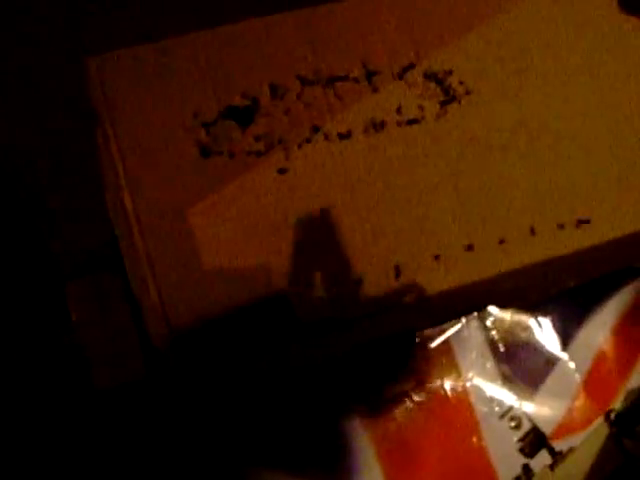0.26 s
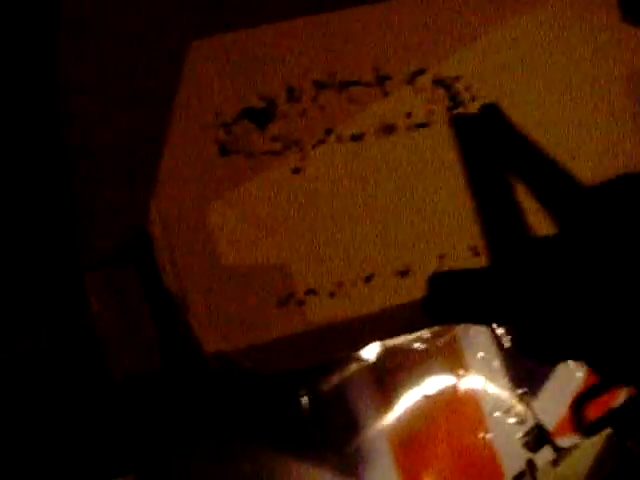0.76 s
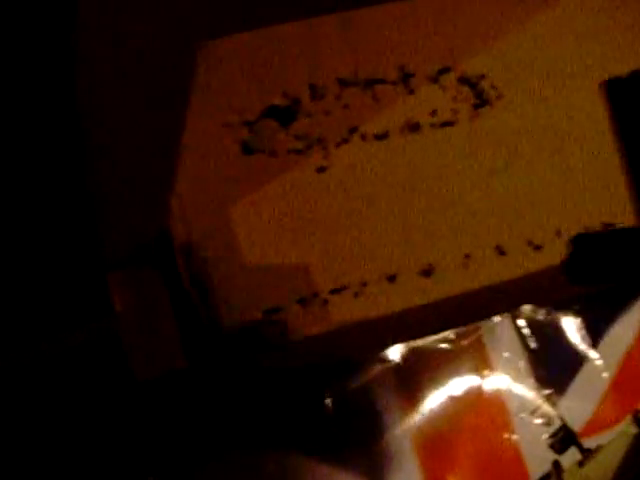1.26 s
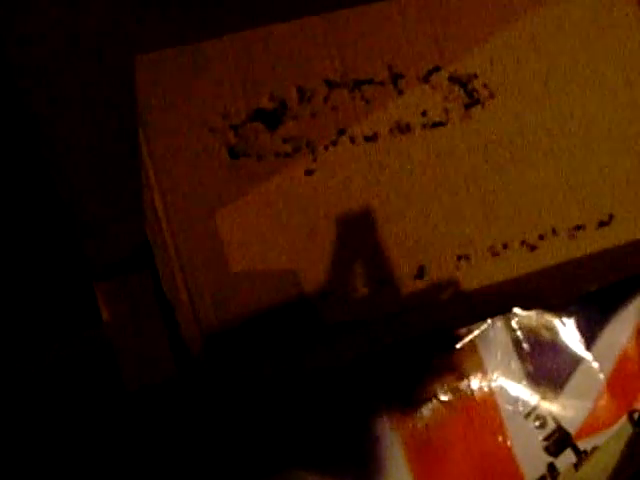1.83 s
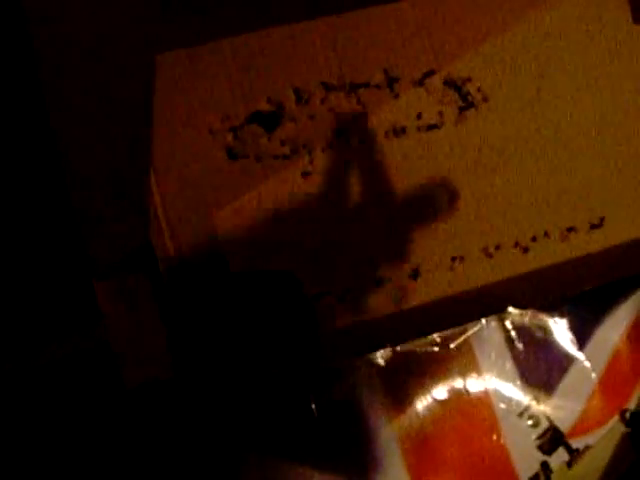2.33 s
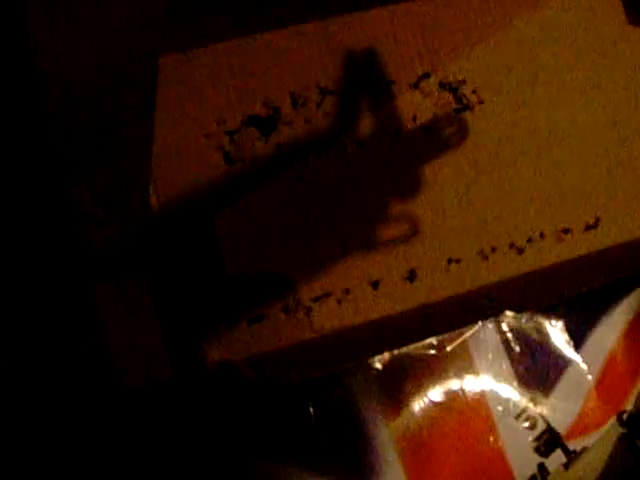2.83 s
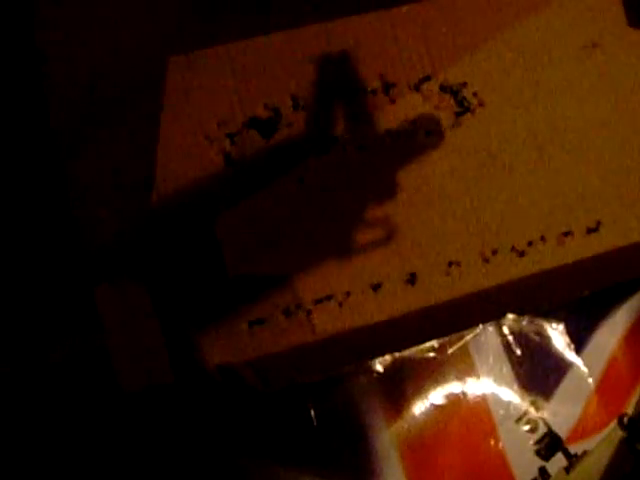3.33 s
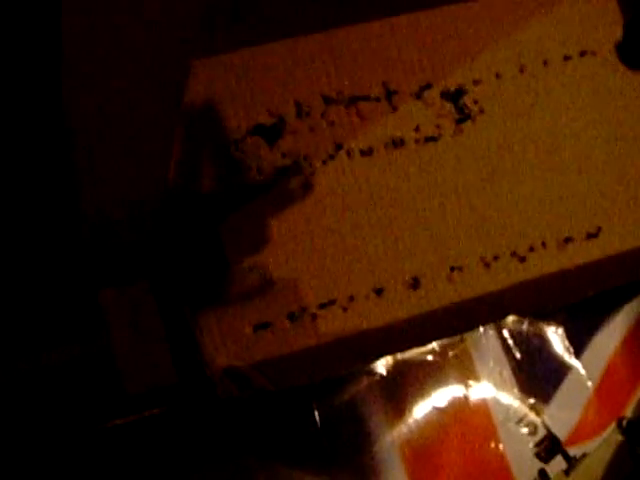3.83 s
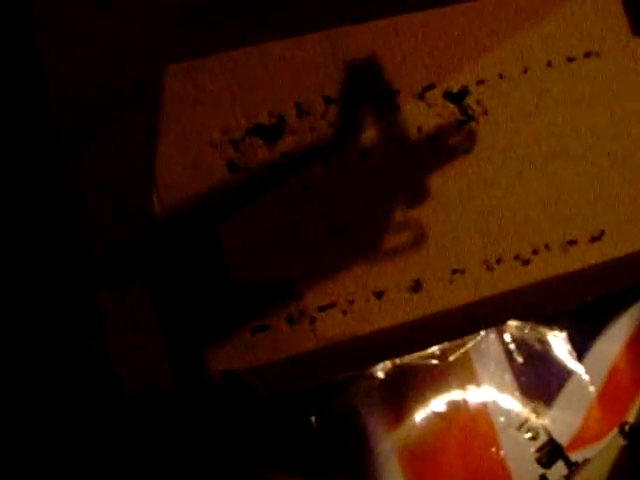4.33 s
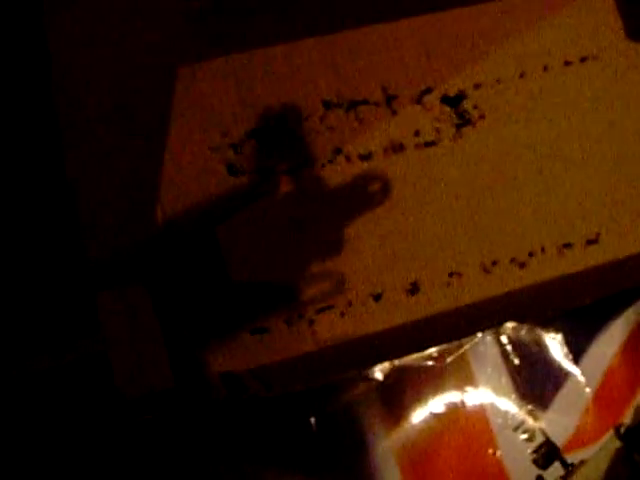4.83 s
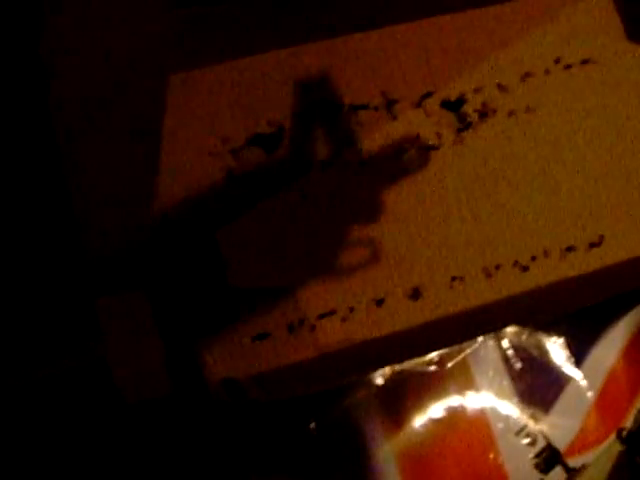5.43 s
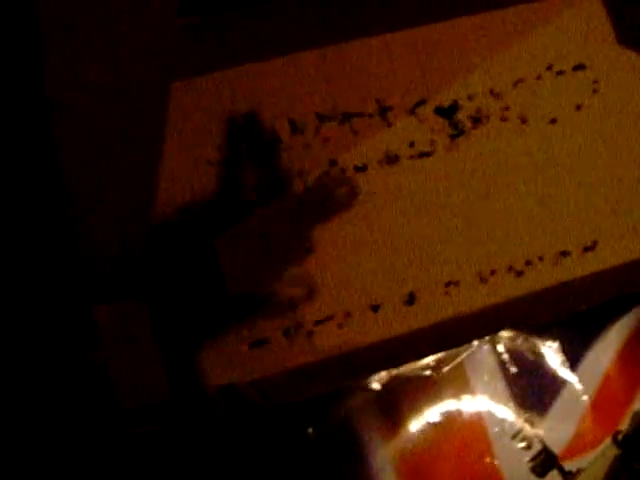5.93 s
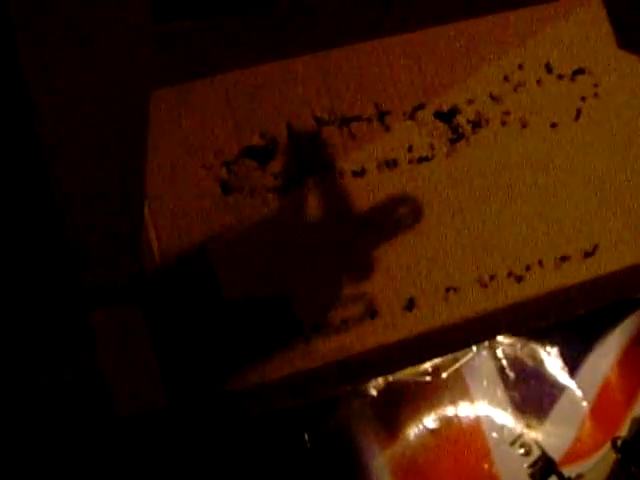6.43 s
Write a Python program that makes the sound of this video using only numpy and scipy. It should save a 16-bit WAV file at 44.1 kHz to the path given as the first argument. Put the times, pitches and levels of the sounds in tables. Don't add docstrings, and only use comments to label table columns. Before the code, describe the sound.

A toy electric pellet rifle is already firing full-auto: grinding motor, rattling gears, fast piston slaps and dull thuds into a hollow cardboard box. It stops, a spring rings briefly, the grip creaks. A short second burst ends in a loud click, pellets bounce and tick, then a third burst starts with a brief gear whine and runs to the end. Small room, close, cheap, overloaded microphone.

```python
import sys
import numpy as np
from scipy import signal
from scipy.fft import rfft, irfft
from scipy.io import wavfile
from scipy.ndimage import uniform_filter1d

SR = 44100
rng = np.random.default_rng(int(sys.argv[2]) if len(sys.argv) > 2 else 0)


def gain_from_db(level_db):
    decades = np.asarray(level_db, float) / 20
    return 10 ** decades


def materialize(psi):
    bounded = np.clip(np.atleast_2d(psi).T, -1, 1)
    quanta = np.round(bounded * 32767).astype(np.int16)
    wavfile.write(sys.argv[1], SR, quanta)


N = 294147

# pulled t/s, released t/s, run-down time/s
BURSTS = [
    (-1.0, 2.08, 0.11),
    (3.380, 4.19, 0.044),
    (5.012, 7.0, 0.1),
]


def rms_one(x):
    return x / np.sqrt(np.mean(x ** 2) + 1e-20)


def in_time(rows, silent_db=-120):
    s, *columns = np.transpose(rows)
    return [np.interp(np.arange(N) / SR, s, c, silent_db, silent_db) for c in columns]


def colour(x, points):
    size = 4096
    hz, db = np.transpose(points)
    bins_hz = np.arange(size // 2 + 1) * SR / size
    log_gain = np.log(gain_from_db(np.interp(np.log(bins_hz + 1), np.log(hz), db)))
    fold = irfft(log_gain)
    fold[1:size // 2] *= 2
    fold[size // 2 + 1:] = 0
    return signal.oaconvolve(x, irfft(np.exp(rfft(fold))))[:N]


def drift(rate):
    r = np.exp(-2 * np.pi * rate * 32 / SR)
    settle = 1000
    white = rng.standard_normal(N // 32 + 2 + settle)
    slow = signal.lfilter([1], [1, -2 * r, r * r], white)[settle:]
    return np.interp(np.arange(N) / 32, np.arange(len(slow)), rms_one(slow))


def ring(clicks, hz, t60):
    r, w = gain_from_db(-60 / (t60 * SR)), 2 * np.pi * hz / SR
    return signal.lfilter([0, np.sin(w)], [1, -2 * r * np.cos(w), r * r], clicks + 1e-18)


def strike(times, level_db, modes, spread_db):
    at = (np.asarray(times) * SR).astype(int).clip(0, N - 1)
    out = np.zeros(N)
    luck = rng.standard_normal((len(at), len(modes)))
    for k, (hz, mode_db, t60) in enumerate(modes):
        clicks = np.zeros(N)
        clicks[at] = gain_from_db(level_db + mode_db + spread_db * luck[:, k])
        out += ring(clicks, hz, t60) * (-1) ** k
    return out


def grains(per_s, spread_db):
    sizes = gain_from_db(spread_db * np.minimum(rng.exponential(1, N), 5))
    sizes = sizes * rng.choice([-1, 1], N)
    return sizes * (rng.random(N) < per_s / SR)


def shot_times():
    # t/s, time between shots/ms
    paces = [
        [(0.038, 67.86), (1.1, 70.77), (1.52, 73.35), (1.6, 76.23), (2.104, 73.39)],
        [(3.489, 71.37), (3.72, 68.51), (4.196, 74.27)],
        [(5.102, 72.24), (5.45, 70.61), (5.8, 74.13), (5.95, 72.45), (6.645, 78.74)],
    ]
    times = []
    for pace in paces:
        s, ms = np.transpose(pace)
        now = s[0]
        while now < s[-1] + .01:
            times.append(now)
            now += np.interp(now, s, ms) / 1000
    return np.array(times)


def shot_cycle():
    times = shot_times()
    return np.interp(np.arange(N) / SR, times, np.arange(len(times)))


def motor():
    # t/s, grind level/dB
    effort = [(0.0, -12), (0.8, -13), (1.08, -11.5), (1.6, -13.5), (2.05, -12.5), (3.5, -12), (3.8, -10),
              (4.18, -14), (5.1, -13), (5.4, -12), (5.7, -11.5), (6.1, -12), (6.36, -11.5), (6.67, -13.5)]
    start_lack_db, start_s, stop_lack_db = 21, .018, 40
    t, out = np.arange(N) / SR, np.zeros(N)
    for pulled, released, run_down in BURSTS:
        coast = np.clip((t - released) / run_down, 0, 2)
        lack_db = start_lack_db * np.exp(-np.abs(t - pulled) / start_s) + stop_lack_db * coast ** 2
        out += gain_from_db(-lack_db) * np.clip((t - pulled) / .004 + 1, 0, 1)
    return out * gain_from_db(in_time(effort, silent_db=-13)[0])


def shake_db():
    # t/s, peak level/dB
    thumps = [(0.304, -13), (0.583, -13), (0.802, -14), (1.141, -14), (1.35, -15), (1.437, -16),
              (1.65, -14), (2.04, -15), (3.471, -17), (3.708, -13), (3.76, -16), (4.037, -18), (5.077, -16),
              (5.528, -11), (5.681, -12), (5.737, -16), (6.31, -15), (6.457, -17)]
    rise_s, fall_s, gain_db = .006, .03, 24
    t, out = np.arange(0, N + 32, 32) / SR, 0
    for s, db in thumps:
        distance = np.where(t < s, (s - t) / rise_s, (t - s) / fall_s)
        out = out + max(db + gain_db, 0) * np.exp(-distance)
    return np.interp(np.arange(N) / SR, t, out)


def chatter():
    ticks = grains(2500, spread_db=7.0) * gain_from_db(1.2 * drift(50))
    return rms_one(colour(ticks, [(2500, -32.5), (6000, -3.5), (9000, -6.5)]))


def gearbox():
    # f/Hz, density level/dB per Hz
    shell = [(150, -35.5), (300, -13), (500, 1), (800, -3), (1600, -3.5), (3000, -5), (4200, -6.5),
             (6500, -11.5), (12000, -22.5)]
    # f/Hz, bandwidth/Hz, level/dB
    shell_peaks = [(456, 65, -13), (560, 94, -12), (756, 100, -7), (970, 100, -5), (1130, 110, 1.5),
                   (1278, 59, -10), (1970, 150, -9), (2430, 120, -9), (3620, 220, -7.5), (3985, 170, -7.5)]
    teeth, panel_db, panel_follows = 14, -2.5, .25
    cycle = shot_cycle()
    teeth_db = 0.73 * np.cos(2 * np.pi * teeth * cycle)
    stroke_db = 0.66 * np.cos(2 * np.pi * (cycle - .7))
    load_db = teeth_db + stroke_db + 2.0 * drift(40)
    rattle = rms_one(grains(9000, spread_db=2.5) * gain_from_db(load_db))
    out = rms_one(colour(rattle, shell)) + gain_from_db(-26.5) * chatter()

    jolts = rms_one(grains(170, spread_db=3.0))
    pulse_db = 1.5 * np.cos(2 * np.pi * (cycle - .2))
    surge_low = gain_from_db(panel_db + panel_follows * shake_db() + pulse_db)
    for hz, width_hz, peak_db in shell_peaks:
        kicks = rms_one(grains(400, spread_db=2.0) * gain_from_db(3.0 * drift(11)))
        jolt_share, surge = (1.3, surge_low) if hz < 1500 else (.5, 1)
        panel = rms_one(ring(kicks + jolt_share * jolts, hz, 1.9 / width_hz))
        out += gain_from_db(peak_db - 7) * surge * panel

    running = motor()
    dull = signal.sosfilt(signal.butter(1, 2500, fs=SR, output="sos"), out)
    speed = np.clip(running / gain_from_db(-20.5), 0, 1) ** 0.36
    return (dull + speed * (out - dull)) / np.std(out) * running * gain_from_db(1.0)


def boom():
    # f/Hz, density level/dB per Hz
    box_air = [(18, -10), (40, -22.5), (100, -14), (200, -4.5), (330, -0.5), (450, -6), (800, -33)]
    boom_db, fill_s = -17, .09
    t = np.arange(N) / SR
    thumps = rms_one(colour(grains(350, spread_db=3.5) * gain_from_db(1.9 * drift(11)), box_air))
    pulse_db = 3.0 * np.cos(2 * np.pi * (shot_cycle() - .06))
    filled = np.zeros(N)
    for pulled, released, run_down in BURSTS:
        filling = np.clip((t - pulled) / fill_s, 0, 1) ** 2
        filled += filling * np.clip(1 - (t - released) / run_down, 0, 1)
    return thumps * filled * motor() * gain_from_db(boom_db + pulse_db + shake_db())


def shots():
    # f/Hz, level/dB, t60/s
    head = [(2600, -13, 0.041), (3290, 6, 0.013), (3930, -1, .02), (4140, 0, 0.011), (5200, -9, .012),
            (7100, -8.5, .01)]
    # f/Hz, level/dB, t60/s
    card = [(190, -10, .025), (330, -5, .018), (520, 0, .014), (720, 0, .012), (950, 1, .011),
            (1180, 1, .011), (1500, -5, .01)]
    # t/s, thud level/dB
    aim = [(0.0, -9), (0.6, -9.5), (0.95, -7), (1.5, -7), (1.65, -10.5), (2.1, -15), (3.5, -10), (4.1, -7),
           (4.2, -20), (5.1, -11.5), (5.45, -8), (6.05, -7), (6.3, -8.5), (6.65, -10)]
    # t/s, peak level/dB
    solid = [(0.451, -4), (0.519, -6), (0.937, -4), (1.007, -4), (1.147, -5), (1.29, -3), (1.363, -5),
             (1.507, -4), (3.559, -5), (3.633, -3), (3.702, -3), (3.784, -2), (3.84, -6), (3.856, -3),
             (3.911, -4), (3.982, -3), (4.054, -3), (5.319, -5), (5.689, -4), (5.824, -3), (5.894, -4),
             (6.039, -3), (6.113, -4), (6.426, -2)]
    s = shot_times()
    luck = rng.standard_normal((len(s), 2))
    speed_db = 20 * np.log10(motor()[(s * SR).astype(int)]) + 12
    slap_db = -12 + 0.6 * speed_db + 1.3 * luck[:, 0]
    thud_db = np.interp(s, *np.transpose(aim)) + 1.6 * luck[:, 1]
    late = rng.random((len(s), 2))
    first_rebound = s + .015 + .012 * late[:, 0]
    second_rebound = s + .035 + .025 * late[:, 1]
    hits = np.r_[s + .0035, first_rebound, second_rebound]
    hits_db = np.r_[thud_db - 2, thud_db - 7, thud_db - 9]
    solid_s, solid_db = np.transpose(solid)
    slaps = strike(s - .0012, slap_db - 5.5, head, spread_db=5.0)
    thuds = strike(hits, hits_db, card, spread_db=2.5)
    return slaps + thuds + strike(solid_s, solid_db - 1.0, card, spread_db=2.5)


def rustle():
    # f/Hz, density level/dB per Hz
    rumble = [(20, -8), (55, -2.5), (110, 2), (200, -1), (300, -6.5), (600, -38)]
    low_rustle = [(120, -32), (250, -4.5), (450, 1.5), (800, -4), (1100, -6.5), (2000, -41.5)]
    high_rustle = [(600, -20), (1200, 6), (2400, 3.5), (4000, -1.5), (7500, -11), (12000, -43)]
    # t/s, level/dB
    stir = [
        [(2.18, -44), (2.258, -62), (2.374, -72), (2.58, -77), (2.684, -64), (2.926, -68), (3.372, -67)],
        [(4.26, -52), (4.3, -46), (4.634, -49.5), (4.746, -50), (4.762, -68), (4.79, -53), (4.85, -56),
         (5.006, -52)],
    ]
    calm_db, air_db = -68, -62
    rumble_db, rumble_follows, fine_db, fine_follows = -66, .25, -67, .42
    settle_s, settle_db, settle_fall_db_s = 2.2, -56, 40
    deep = rms_one(colour(rng.standard_normal(N), rumble)) * gain_from_db(2.0 * drift(9.2))
    lumpy = rms_one(colour(grains(700, spread_db=2.0), low_rustle)) * gain_from_db(2.5 * drift(25))
    fine = rms_one(colour(grains(6000, spread_db=1.5), high_rustle)) * gain_from_db(1.3 * drift(20))
    hush = gain_from_db(air_db) * rms_one(colour(rng.standard_normal(N), low_rustle))
    since = np.arange(N) / SR - settle_s
    out = hush + gain_from_db(settle_db - settle_fall_db_s * np.abs(since)) * fine
    for pause in stir:
        stir_db, = in_time(pause, silent_db=-300)
        over_db = stir_db - calm_db
        out += gain_from_db(rumble_db + rumble_follows * over_db) * deep
        out += gain_from_db(stir_db) * lumpy
        out += gain_from_db(fine_db + fine_follows * over_db) * fine
    return out


def spring():
    # f/Hz, rms level/dB
    coil = [(1174, -61), (1373, -66.5), (1448, -64.5), (2035, -65), (2347, -59.5), (2929, -79), (3214, -79),
            (3235, -75), (3838, -69)]
    heard_s, rise_s, fall_db_s = 2.2, .08, 42
    damped_s, damped_fall_db_s = 2.41, 200
    t = np.arange(N) / SR
    ring_db = 4.5 - 16 * np.clip((heard_s - t) / rise_s, 0, 9)
    ring_db -= fall_db_s * np.maximum(t - heard_s, 0)
    ring_db -= damped_fall_db_s * np.maximum(t - damped_s, 0)
    partials = np.zeros(N)
    for hz, db in coil:
        strength = gain_from_db(db + 3.0 + 2.5 * drift(hz / 100))
        phase = 2 * np.pi * (hz * t + rng.random()) + hz / 8000 * drift(25)
        partials += strength * np.sin(phase)
    return np.sqrt(2) * gain_from_db(ring_db) * partials


def creak():
    # t/s, groan f/Hz, groan level/dB, squeak level/dB
    grip = [
        (2.58, 620, -80, -78),
        (2.65, 617, -60, -68),
        (2.71, 605, -58, -66),
        (2.75, 480, -62, -72),
        (2.82, 390, -64, -72),
        (2.88, 380, -80, -80),
    ]
    hz, groan_db, squeak_db = in_time(grip)
    phase = 2 * np.pi * np.cumsum(hz * (1 + 0.092 * drift(90))) / SR
    groan = np.sin(phase) * gain_from_db(groan_db - 1 + 4.0 * drift(40))
    squeak = rms_one(ring(rng.standard_normal(N), 2350, .025))
    return groan + squeak * gain_from_db(squeak_db)


def bounces():
    # t/s, peak level/dB, ring f/Hz, boom level/dB, treble level/dB
    pellets = [(2.7264, -52, 1190, -2, -32), (2.9434, -51, 947, -3, -27), (3.1644, -51, 1330, -7, -23),
               (4.2867, -41, 1110, -9, -19), (4.2974, -31.5, 1380, -13, 2), (4.326, -38, 1220, -4, -13),
               (4.3594, -42, 1020, -4, -18), (4.4006, -31.5, 1170, -6, -33), (4.4135, -36, 1160, 1, -29),
               (4.4644, -40, 910, 3, -16), (4.518, -27, 1680, -2, -15), (4.594, -35, 1500, -6, -20),
               (4.6105, -20, 1540, -15, -3), (4.6205, -23, 2590, -22, -15), (4.6862, -31, 1230, 0, -33),
               (4.7046, -31, 3000, -6, -8), (4.785, -35, 2200, -6, -33), (4.8, -38, 1120, -13, -36),
               (4.854, -39, 1300, -18, -3), (4.8614, -43, 1120, -15, -9), (4.9182, -38, 1470, -11, -17),
               (4.9565, -33, 2560, -17, -29)]
    # t/s, peak level/dB, ring f/Hz, boom level/dB, treble level/dB
    trigger = [
        (2.586, -44, 3200, -25, -14),
        (3.251, -45, 1300, -10, -3),
        (3.372, -52, 2500, -16, 4),
        (4.2356, -7, 1200, -10, -18),
    ]
    out, length = np.zeros(N + SR), SR // 4
    t = np.arange(length) / SR
    white = rng.standard_normal(N)
    box = rms_one(colour(white, [(200, -40), (450, -3), (800, -7), (1300, -11), (12000, -57)]))
    card = rms_one(colour(white, [(400, -17), (1000, -0.5), (2000, 1.5), (4000, -8.5), (7000, -17),
                                  (12000, -50)]))
    foil = rms_one(colour(white[::-1], [(1500, -30), (4000, -1), (8000, -1), (11000, -7)]))
    for k, (s, peak_db, hz, boom_db, treble_db) in enumerate(pellets + trigger):
        t60 = .11 + .002 * (peak_db + 35) if k < len(pellets) else .05
        start = int(s * SR)
        part = slice(k * length // 4, k * length // 4 + length)
        fall = gain_from_db(-60 * t / t60) * np.minimum(t / .0006, 1)
        own = rms_one(ring(white[part], hz, 0.02))
        tone = np.sin(2 * np.pi * hz * t) * gain_from_db(-60 * t / min(.03, t60 / 4))
        tick = foil[part] * gain_from_db(-60 * t / 0.0035)
        rattle = gain_from_db(-14) * card[part] + gain_from_db(-12) * own
        rattle += gain_from_db(boom_db - 12) * box[part] + gain_from_db(treble_db - 12) * foil[part]
        out[start:start + length] += gain_from_db(peak_db) * (rattle * fall + gain_from_db(-5) * tone + gain_from_db(-13) * tick)
    return out[:N]


def whine():
    # t/s, f/Hz, level/dB, length/s
    spin_up = [
        (3.388, 580, -28, .01),
        (3.418, 1120, -18, .03),
        (3.442, 2210, -18, .035),
        (3.445, 550, -32, .03),
        (5.018, 603, -20, .008),
        (5.021, 1206, -24, .01),
        (5.044, 1230, -6, .006),
        (5.066, 1390, -9, .009),
        (5.062, 690, -22, .016),
    ]
    out, t = np.zeros(N), np.arange(N) / SR
    waver, flutter = 0.03 * drift(120), gain_from_db(2.5 * drift(150))
    for s, hz, db, length in spin_up:
        part = slice(int((s - length) * SR), int((s + 2 * length) * SR))
        late = t[part] - s
        phase = 2 * np.pi * np.cumsum(hz * (1 + 0.6 * late + waver[part])) / SR
        swell = np.cos(np.pi / 2 * late / np.where(late < 0, length, 2 * length)) ** 2
        out[part] += np.sqrt(2) * gain_from_db(db) * swell * flutter[part] * np.sin(phase)
    return out


def room(x):
    t60_s, wall_cut_hz = 0.27, 5600
    t = np.arange(SR // 2) / SR
    echoes = rng.standard_normal((2, len(t))) * np.clip((t - .004) / 0.0069, 0, 1)
    low = signal.sosfilt(signal.butter(1, wall_cut_hz, fs=SR, output="sos"), echoes[0])
    high = signal.sosfilt(signal.butter(1, wall_cut_hz, "high", fs=SR, output="sos"), echoes[1])
    tail = low * gain_from_db(-60 * t / t60_s) + high * gain_from_db(-60 * t / (1.14 * t60_s))
    return signal.oaconvolve(x, tail / np.sqrt(np.sum(tail ** 2)))[:N]


def scene():
    rifle = gearbox() + boom() + shots() + whine()
    loose = bounces()
    echoes = gain_from_db(-14) * room(rifle + 0.2 * loose)
    return (rifle + loose + echoes + rustle() + spring() + creak())[None]


def gain_control(x, ceiling_db=-9.5, release_db_s=402.0, attack_s=.0015):
    level_db = 10 * np.log10(uniform_filter1d(x ** 2, size=96) + 1e-12)
    climb = release_db_s * np.arange(N) / SR
    held_db = np.maximum.accumulate(level_db + climb) - climb
    r = np.exp(-1 / (attack_s * SR))
    cut_db = signal.lfilter([1 - r], [1, -r], np.maximum(held_db - ceiling_db, 0))
    return x * gain_from_db(-.8 * cut_db)


def overload(x, top=.67, knee=3.5):
    return top * np.tanh((np.abs(x) / top) ** knee) ** (1 / knee) * np.sign(x)


def low_pass(x):
    return signal.sosfilt(signal.butter(12, 12240, fs=SR, output="sos"), x)


def record(dry):
    # f/Hz, level/dB
    mic = [(4500, 0), (7000, -7), (8800, -8.5), (9500, 0), (10600, 17), (11300, 12), (12000, -9.5),
           (12600, -32)]
    x = gain_control(colour(dry[0], mic))
    x = x + .27 * x ** 2 * (1 - np.tanh(3 * x ** 2))
    cut = signal.ellip(10, .3, 60, 11950, fs=SR, output="sos")
    mix = overload(signal.sosfilt(cut, overload(x)))
    return low_pass(mix[None])


dry = scene()
out = record(dry)
materialize(out)
```